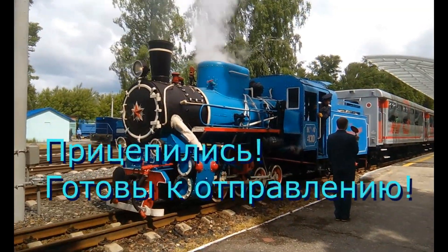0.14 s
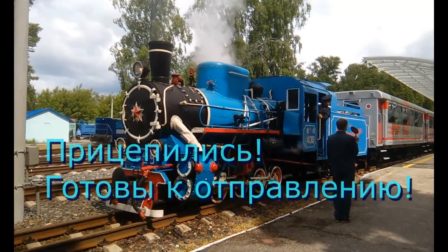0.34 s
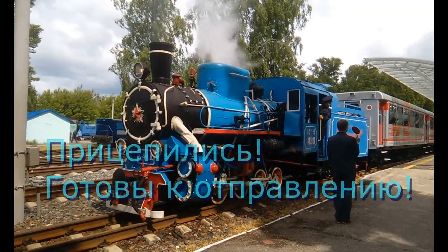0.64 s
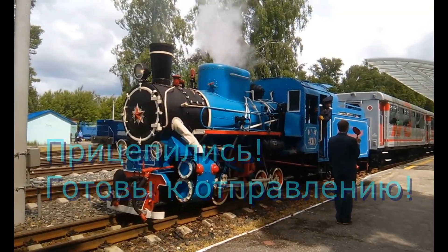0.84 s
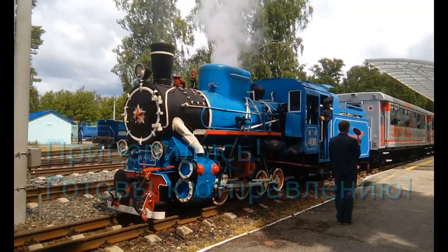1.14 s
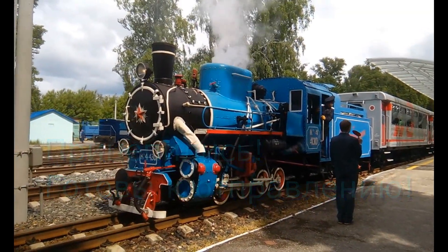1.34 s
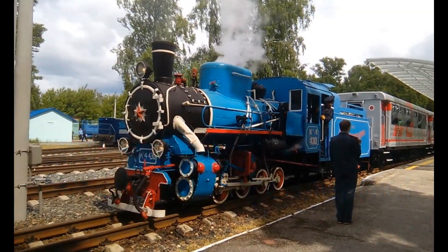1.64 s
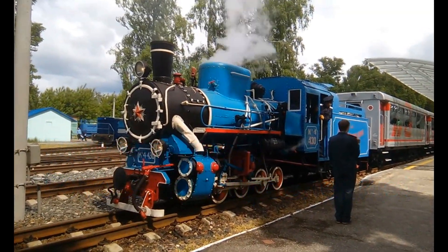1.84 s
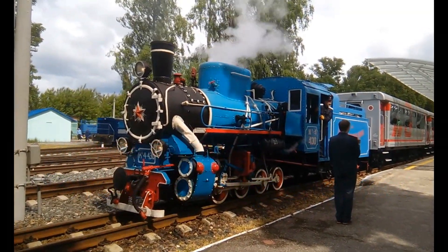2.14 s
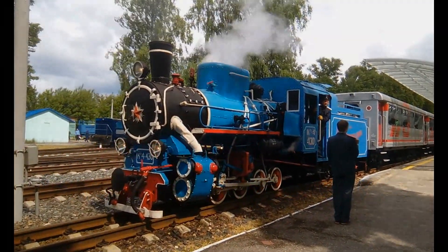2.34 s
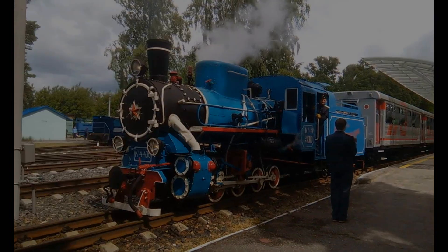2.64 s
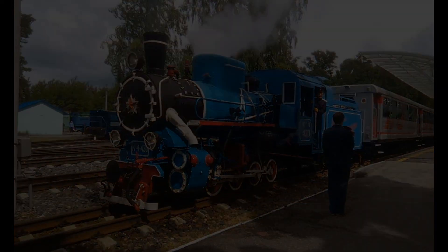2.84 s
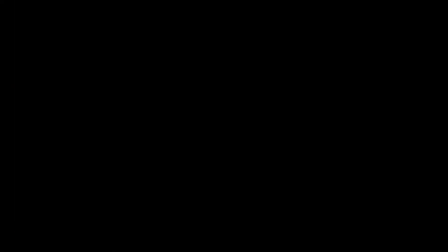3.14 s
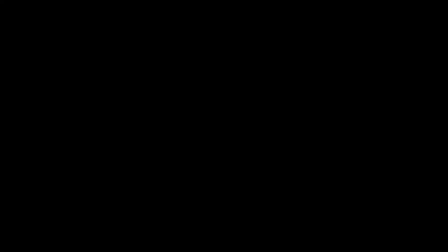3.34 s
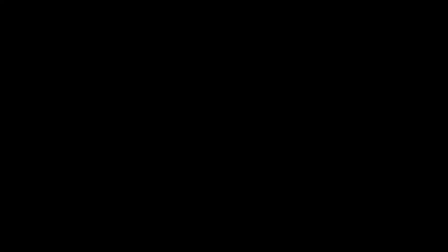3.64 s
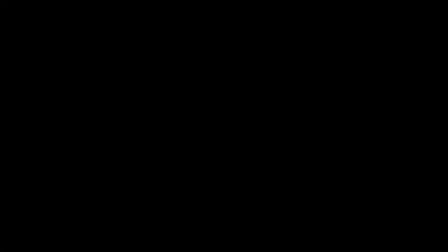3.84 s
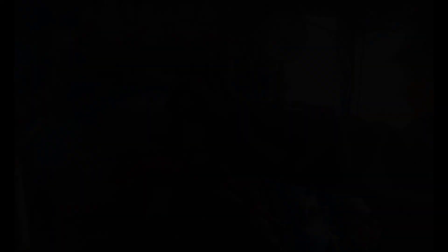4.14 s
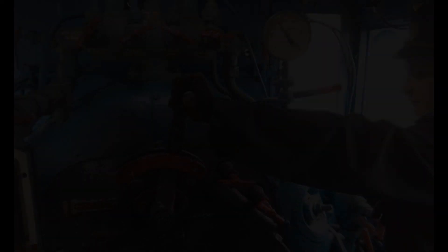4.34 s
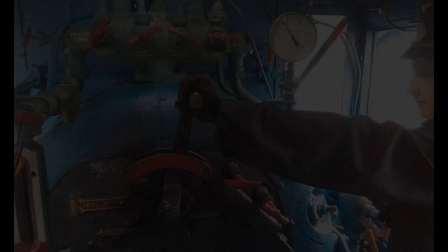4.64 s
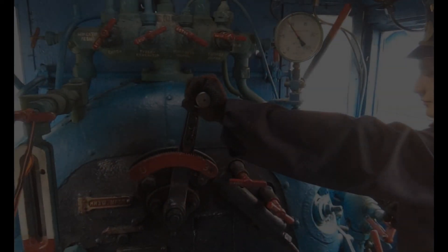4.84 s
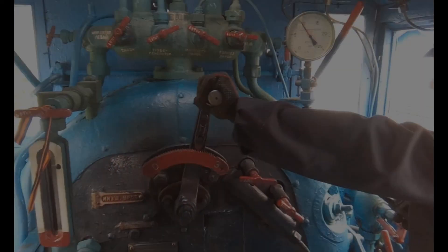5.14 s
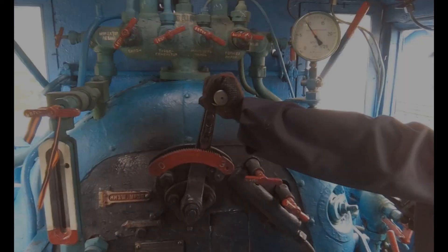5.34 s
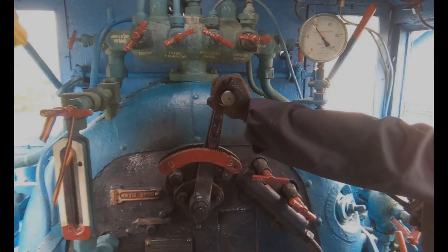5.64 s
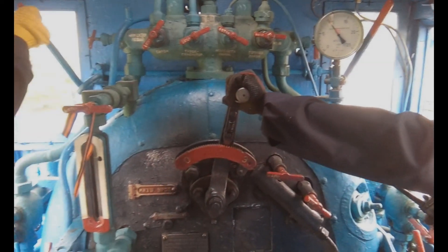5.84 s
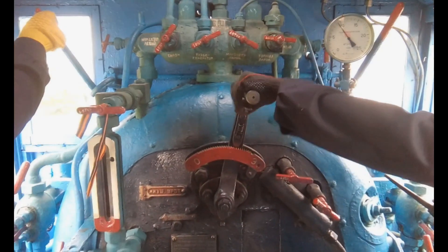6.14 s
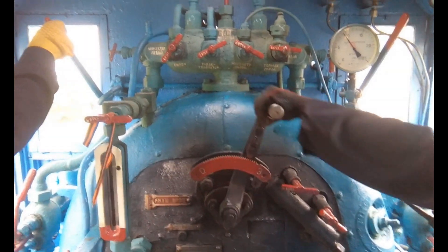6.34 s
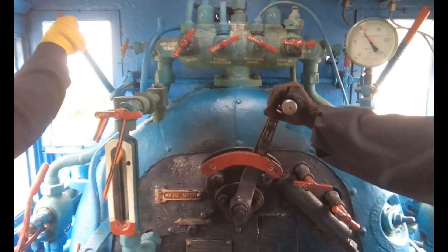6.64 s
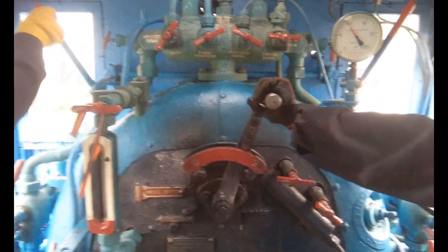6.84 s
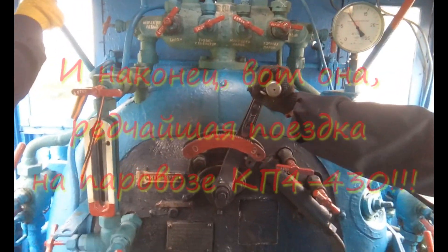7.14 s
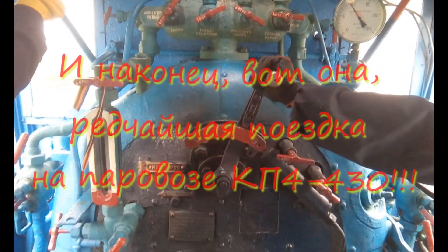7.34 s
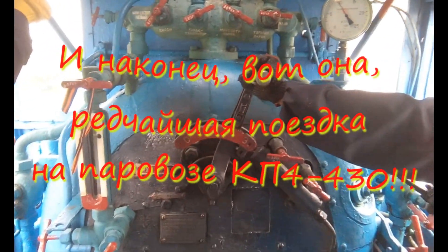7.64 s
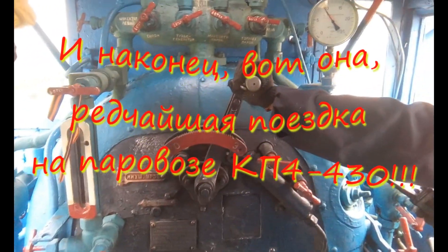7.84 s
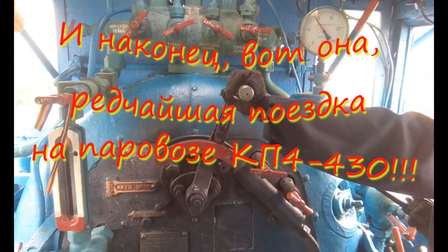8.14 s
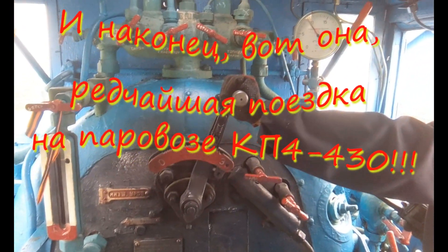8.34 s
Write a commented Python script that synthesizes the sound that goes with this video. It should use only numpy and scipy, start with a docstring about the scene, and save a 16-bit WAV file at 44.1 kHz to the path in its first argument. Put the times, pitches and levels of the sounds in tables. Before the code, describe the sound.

Safety-valve hiss fades gently, a silent gap follows, then low firebox roar swells into a harsh, wavering two-toned locomotive whistle held to the end.

```python
"""Steam locomotive, platform and cab

On the platform a safety valve hisses (shaped noise, nozzle resonances) over chimney draught, wind and
a humming generator (shaft-order sines). After a silent cut the cab fades in: firebox noise, ringing
flues, the generator, then a two-bell whistle, pulled and held: shaken tones, turbulent modes, steam.
Puffs, knocks and thumps (short swells of low noise) fall in both places. Mono, copied to both channels."""
import sys
import numpy as np
from scipy import signal
from scipy.fft import rfft, irfft, next_fast_len
from scipy.io import wavfile
from scipy.ndimage import uniform_filter1d, map_coordinates

SR = 44100
rng = np.random.default_rng(int(sys.argv[2]) if len(sys.argv) > 2 else 0)


def generate_wav(signal):
    """Clip the signal to [-1, 1] and save it as 16-bit WAV at the path in sys.argv[1]."""
    frames = np.transpose(np.atleast_2d(signal))
    scaled = np.clip(frames, -1, 1) * 32767
    pcm = np.round(scaled).astype(np.int16)
    wavfile.write(sys.argv[1], SR, pcm)


N = 375291

# Spectra are relative; noise is normalised before its level is set.
# whistle bell pitch: settled/Hz, slur share, slur/s, flat share, climb/s, cold share, warming/s
LONG_PITCH = (929, -.05, .035, .082, .25, .012, .8)
SHORT_PITCH = (1177, .045, .012, .074, .125, .012, .6)
# bell tones before shake and falter: t/s, level/dB
LONG_TONE = [(4.75, -43), (4.79, -24), (5.02, -17), (5.71, -12), (5.73, -9), (5.96, -12), (5.98, -20.5),
             (6.2, -19), (6.36, -24), (6.41, -12.5), (6.46, -22), (6.62, -12), (6.86, -21), (6.91, -14),
             (6.97, -23.5), (7.01, -15), (7.06, -33), (7.13, -13), (7.18, -28), (7.25, -13), (7.38, -21.5),
             (7.5, -12), (7.63, -12), (7.68, -29), (7.72, -12.5), (7.96, -12), (8.0, -18), (8.06, -10),
             (8.12, -17.5), (8.21, -11), (8.24, -21), (8.32, -14), (8.41, -25), (8.51, -19.5)]
SHORT_TONE = [(4.74, -23.5), (4.79, -13.5), (5.51, -13), (5.55, -7), (5.6, -21), (5.64, -7), (5.75, -17.5),
              (5.81, -6), (5.91, -14.5), (5.93, -24), (5.97, -6), (6.07, -9.5), (6.11, -15.5), (6.2, -6.5),
              (6.27, -17), (6.37, -4.5), (6.41, -27), (6.45, -8.5), (6.57, -6), (6.62, -17.5), (6.82, -6),
              (6.86, -25.5), (6.93, -10), (6.97, -27), (7.0, -18), (7.11, -7), (7.35, -15), (7.37, -7.5),
              (7.62, -16), (7.67, -8), (7.74, -30), (7.83, -6.5), (7.93, -22), (7.98, -9.5), (8.01, -15.5),
              (8.51, -7)]
# turbulent bell modes, relative to blowing strength: multiple of pitch, width/Hz, level/dB
LONG_MODES = [(.81, 48, -32.5), (.95, 39, -16.5), (1, 60, -10.5), (1.699, 40, -28), (2.99, 38, -20.5),
              (3.99, 25, -18.5), (4.19, 50.1, -20.5), (5.42, 46, -23), (5.7, 70, -15.5)]
SHORT_MODES = [(.955, 49.6, -10.5), (1.01, 79.6, -8), (1.8, 30, -30), (2.83, 90, -18), (3.98, 91, -19),
               (4.921, 170, -17), (5.6, 216, -28.5)]
# short bell's octave, flaring as it starts: t/s, level/dB
SQUEAK = [(4.737, -32), (4.745, -31), (4.761, -18.5), (4.79, -34), (4.806, -25), (4.825, -62)]
# overtones: t/s, long bell's octave/dB, short bell's octave/dB, short bell's twelfth/dB
OVERTONES = [(4.85, -43.5, -40, -42), (5.19, -29.5, -32, -29), (5.92, -33.5, -32.5, -21),
             (6.15, -33, -25.5, -21.5), (6.44, -31.5, -33, -21), (6.49, -42, -39, -26),
             (6.88, -30, -43, -31), (6.93, -40, -45, -13), (6.97, -23, -31, -23.5), (7.09, -40, -41, -26),
             (7.76, -32.5, -37, -22), (7.89, -35, -46, -32), (8.09, -26, -25, -23.5),
             (8.23, -30.5, -38, -17), (8.26, -28.5, -49, -31), (8.51, -32.5, -34, -24)]
# whistle jet before surge and wobble: t/s, steam level/dB, rumble level/dB
JET = [(4.75, -29, -48), (4.89, -21.5, -48.5), (5.24, -17, -50), (5.56, -16.5, -41), (5.59, -14.5, -47),
       (5.86, -19.5, -45.5), (5.95, -16.5, -49), (5.97, -21, -41), (6.36, -17.5, -42), (6.44, -17, -41),
       (6.59, -20, -41.5), (6.9, -18, -40.5), (6.98, -16.5, -39), (7.14, -21.5, -44), (7.28, -19, -50),
       (7.39, -19, -41), (7.67, -18.5, -42.5), (7.79, -17.5, -37), (7.86, -22.5, -39), (7.9, -19, -36),
       (8.15, -19, -45), (8.24, -17, -47), (8.3, -22, -46), (8.51, -22, -48)]
# whistle steam, sizzle and rumble spectra: f/Hz, level/dB per Hz
STEAM_SPECTRUM = [(320, -57), (550, -35), (760, -16.5), (1030, -16), (1300, -17.5), (1500, -18.5),
                  (2250, -20), (2970, -18), (3440, -15), (4280, -19), (5200, -16), (6500, -15.5),
                  (8000, -30.5), (10000, -34), (14000, -57)]
SIZZLE_SPECTRUM = [(4410, -19.5), (7500, -5), (8280, -11), (12800, -17.5), (15300, -23.5)]
RUMBLE_SPECTRUM = [(12, -51), (20, -28), (70, -18), (102, -20), (135, -9.5), (305, -5), (420, -1.5),
                   (522, -3.5), (650, -8), (840, -13), (1430, -120)]
# safety valve: t/s, hiss level/dB, nozzle's shrill ring level/dB
VALVE_LEVELS = [(0.0, -35, -29.5), (0.15, -33.5, -34), (0.29, -38.5, -40), (0.32, -37, -35),
                (0.37, -39, -46), (0.64, -41, -45.5), (0.78, -41, -41), (0.93, -43, -45),
                (1.32, -37.5, -34.5), (1.44, -40, -42.5), (1.49, -39, -35), (1.62, -41, -43),
                (2.26, -42.5, -48), (2.59, -43.5, -39.5), (2.63, -43.5, -49), (2.89, -45, -44),
                (2.92, -43.5, -42.5), (3.24, -46, -46)]
# valve hiss and its fine fizz, spectra: f/Hz, level/dB per Hz
VALVE_SPECTRUM = [(1290, -27), (2200, -9.5), (2610, -16.5), (2900, -8.5), (3740, -5), (4560, -11),
                  (5080, 1.5), (6440, -16), (6970, -11.5), (8500, -30), (11000, -50), (18700, -120)]
FIZZ_SPECTRUM = [(4710, -24), (8000, 1.5), (8470, -7), (9040, -0.5), (9420, -5), (10200, -1.5),
                 (10800, -4.5), (11900, -11.5), (14100, -10.5), (15300, -18)]
# nozzle resonances, then its shrill ones, relative: f/Hz, width/Hz, level/dB
NOZZLE_RINGS = [(2980, 160, -18), (3730, 660, -7.5), (5200, 220, -6.5), (5730, 330, 0), (7300, 320, -7)]
SHRILL_RINGS = [(6320, 130, -3), (6630, 160, -4)]
# chimney draught spectrum: f/Hz, level/dB per Hz
DRAUGHT_SPECTRUM = [(150, -38), (250, -2.5), (279, -16), (306, -12), (386, -19), (414, -9), (445, -28),
                    (673, -12), (841, -7.5), (1020, -15), (1140, -11), (1440, -4.5), (1950, -4),
                    (2610, -25), (2800, -16), (3640, -46), (6160, -120)]
# chimney resonances, relative to the draught: f/Hz, width/Hz, level/dB
CHIMNEY_RINGS = [(745, 15, -17.5), (862, 60, -5), (1416, 16, -11)]
# firebox roar spectrum: f/Hz, level/dB per Hz
FIREBOX_SPECTRUM = [(12, -45), (20, -15), (74, -15), (180, -13), (425, -6.5), (531, -13), (721, -1),
                    (979, -17), (1490, -7.5), (2070, -19.5), (4150, -22.5), (5800, -19), (7650, -23),
                    (8320, -33), (15300, -53)]
# flues and leaking fittings, before the cab gain: f/Hz, width/Hz, level/dB
FLUE_RINGS = [(731, 10, -50), (817, 41, -60), (1470, 21, -56), (5270, 60, -73), (5706, 60, -67),
              (6440, 51, -75), (7483, 50, -66), (7698, 50, -74)]
# generator shaft orders, before the order gain: multiple of shaft rate, peak level/dB
FAR_ORDERS = [(1, -79), (2, -63.5), (3, -61), (4, -59.5), (6, -67.5), (11, -78), (12, -54), (17, -62.5)]
NEAR_ORDERS = [(1, -55), (2, -62.5), (4, -59), (6, -56.5)]
# puffs, knocks and thumps: t/s, thud level/dB, boom level/dB, half length to 1/e /s
THUMPS = [(0.296, -58, -47, .04), (0.731, -38, -45, 0.01), (0.743, -48, -46, 0.091),
          (1.07, -66, -51, 0.033), (1.345, -68, -55, 0.054), (1.92, -68, -51, 0.046),
          (2.312, -52, -43, 0.019), (2.88, -72, -51.5, 0.098), (4.728, -45, -43, 0.032),
          (6.416, -29.5, -47, 0.049), (8.492, -56, -62, 0.02)]
# thud, boom and steady wind, spectra: f/Hz, level/dB per Hz
THUD_SPECTRUM = [(100, -30), (190, -5.5), (250, 6.5), (500, -1), (800, -16), (2000, -74)]
BOOM_SPECTRUM = [(15, -30), (40, -12), (80, -6), (160, -2.5), (260, -12), (500, -35)]
WIND_SPECTRUM = [(20, -23), (45, -15), (80, 1.5), (250, -5), (330, -13), (700, -1.5), (1500, -63)]

LEVER_S = 4.734  # whistle valve opens
SEEP_S, SEEP_DB = 4.685, -47  # steam seeps out as the lever starts to move
SIZZLE_DB, SIZZLE_FOLLOWS = -32.5, 0.85  # swings less than the steam
WET_DB, DRY_S, DRYING_S = 5, 5.65, 0.23  # extra sizzle until condensed water is blown out
MUFFLED_DB = 2  # wet steam weakens upper modes
FIZZ_DB, FIZZ_FOLLOWS = -53, .55  # swings less than the valve
DRAUGHT_DB, WIND_DB = -46.5, -58.5
FIREBOX_DB, CAB_GAIN_DB, CAB_GROWS_DB_PER_S = -45.5, -2.4, 1.5  # firebox level precedes the cab gain
ORDER_GAIN_DB = 2
CUT_S, CUT_FALL_S, CUT_DB = 3.2515, .009, -60
FADE_IN_S, FADE_LENGTH_S, FADE_POWER = 4.065, .55, 1.04
LIMIT_DB, LIMIT_S = -6.5, 0.013  # limiter's rms ceiling, averaging time
TOP_HZ = 15420


def amp(db):
    """Decibels to gain."""
    return 10 ** (np.asarray(db) / 20)


def unit(x):
    """Scale to rms 1."""
    return x / np.sqrt(np.mean(np.abs(x) ** 2) + 1e-20)


def curves(rows):
    """Interpolate each column after the time to one value per sample."""
    s, *cols = np.transpose(rows)
    return [np.interp(np.arange(N) / SR, s, c) for c in cols]


def begun(s, rise_s):
    """0 before time s, then a linear ramp to 1."""
    return np.clip((np.arange(N) / SR - s) / rise_s, 0, 1)


def wobble(rate_hz):
    """Smooth random curve, rate_hz knots a second."""
    knots = rng.standard_normal(int(N * rate_hz / SR) + 4)
    coarse = np.arange(0, N + 32, 32)
    return np.interp(np.arange(N), coarse, map_coordinates(knots, [coarse * rate_hz / SR]))


def filtered(x, response):
    """Apply a gain that is a function of frequency."""
    m = next_fast_len(N + 8192)
    return irfft(rfft(x, m) * response(np.fft.rfftfreq(m, 1 / SR)), m)[..., :N]


def rush(spectrum, patchy_db):
    """Coloured noise, rms 1; nearby walls leave narrow, slowly shifting streaks of gain."""
    z = signal.stft(rng.standard_normal(N), nperseg=512)[2]
    field = uniform_filter1d(rng.standard_normal(z.shape), size=2, axis=0)
    field = uniform_filter1d(field, size=50, axis=1)
    noise = signal.istft(z * amp(patchy_db * unit(field)), nperseg=512)[1][:N]
    f, db = np.transpose(spectrum)
    return unit(filtered(noise, lambda hz: amp(np.interp(np.log(hz + 1), np.log(f + 1), db))))


def ringing(modes):
    """Steady turbulence in fixed resonances, each close to its rms level."""
    def peaks(hz):
        return sum(amp(db) / np.sqrt(width) / (1 + (2 * (hz - mid) / width) ** 2) ** 0.84
                   for mid, width, db in modes)
    return filtered(rng.standard_normal(N), peaks) * np.sqrt(SR / 2)


def breathy(turns, width_hz, flicker_db):
    """Turbulence in one resonance that follows the phase in turns; rms 1."""
    m = next_fast_len(N)
    hz = np.fft.rfftfreq(m, 1 / SR)
    bands = np.exp(2j * np.pi * rng.random((2, len(hz)))) / (1 + (2 * hz / width_hz) ** 2)
    slow = irfft(bands, m)[:, :N]
    carried = slow[0] * np.cos(2 * np.pi * turns) + slow[1] * np.sin(2 * np.pi * turns)
    return unit(amp(flicker_db * wobble(4)) * carried)


def bell_pitch(pitch):
    """Pitch slurs as the bell speaks, climbs from flat with pressure, creeps up as the bell warms; Hz."""
    settled_hz, slur, slur_s, flat, climb_s, cold, warming_s = pitch
    since = np.clip(np.arange(N) / SR - LEVER_S, 0, None)
    slurred = slur * np.exp(-since / slur_s)
    flattened = flat * np.exp(-(since / climb_s) ** 2)
    chilled = cold * np.exp(-since / warming_s)
    return settled_hz * (1 - slurred - flattened - chilled)


def bell(pitch, rows, modes, drift, shake_db, falter_db, rough):
    """Jet-shaken tone plus modal turbulence at the mean blowing strength; also returns phase in turns."""
    start_s = rows[0][0]
    db = curves(rows)[0]
    # condensed water roughens the start
    wet = 1 + rough * begun(start_s, .1) * (1 - begun(start_s + .1, .4))
    turns = np.cumsum(bell_pitch(pitch) * (1 + drift * wet * wobble(40))) / SR
    falters = falter_db * wet ** .5 * np.clip(wobble(18) - .55, 0, None)  # brief sinkings
    tone = np.sqrt(2) * amp(db + shake_db * wobble(45) - falters) * np.sin(2 * np.pi * turns)
    blowing = uniform_filter1d(amp(db), size=SR // 4)
    muffled = MUFFLED_DB * (1 - begun(DRY_S, DRYING_S))
    breath = 0
    for k, width_hz, level_db in modes:
        build_up = begun(start_s, 6 / width_hz)  # narrower modes build up slower
        gain = amp(level_db - muffled * (k > 2.9)) * build_up
        breath = breath + gain * breathy(k * turns, width_hz, flicker_db=3.0)
    return (tone + blowing * breath) * begun(start_s, 0.0037), turns


def overtones(low_turns, high_turns):
    """Octaves and twelfth as narrow turbulence on the bells' phases, plus the starting squeak."""
    squeak = np.sqrt(2) * amp(curves(SQUEAK)[0]) * np.sin(2 * np.pi * 2 * high_turns)
    squeak = squeak * begun(SQUEAK[0][0], 0.0036)
    low_db, high_db, twelfth_db = curves(OVERTONES)
    octaves = amp(low_db) * breathy(2 * low_turns, 26, flicker_db=1.4)
    octaves = octaves + amp(high_db) * breathy(2 * high_turns, 38, flicker_db=-0.5)
    octaves = octaves * begun(OVERTONES[0][0], 0.16)
    twelfth = amp(twelfth_db) * breathy(2.955 * high_turns, 95, flicker_db=1.2)
    return squeak + octaves + twelfth * begun(LEVER_S, 0.044)


def steam_jet():
    """Escaping steam: broadband roar, sizzle and rumble; the seep precedes the valve opening."""
    steam_db, rumble_db = curves(JET)
    surge = wobble(24) + .4 * wobble(9)  # wet steam surges through the gap
    opened = begun(LEVER_S, 0.0033)
    seep = amp(SEEP_DB) * begun(SEEP_S, 0.016)
    steam = (amp(steam_db + 1.01 * surge) * opened + seep) * rush(STEAM_SPECTRUM, patchy_db=2.5)
    swing_db = SIZZLE_FOLLOWS * (steam_db - np.median(steam_db[-SR:]))
    wet_db = WET_DB * (1 - begun(DRY_S, DRYING_S))
    sizzle = amp(SIZZLE_DB + swing_db + wet_db + 0.69 * surge) * rush(SIZZLE_SPECTRUM, patchy_db=3.5)
    rumble = amp(rumble_db + 2.0 * wobble(16)) * rush(RUMBLE_SPECTRUM, patchy_db=2.0)
    return steam + (sizzle + rumble) * opened


def whistle():
    """Two bells a third apart, wandering overtones and the steam jet that blows them."""
    low, low_turns = bell(LONG_PITCH, LONG_TONE, LONG_MODES,
                          drift=0.00296, shake_db=1.0, falter_db=7.5, rough=3.12)
    high, high_turns = bell(SHORT_PITCH, SHORT_TONE, SHORT_MODES,
                            drift=.005, shake_db=1.4, falter_db=3, rough=1.227)
    return low + high + overtones(low_turns, high_turns) + steam_jet()


def safety_valve():
    """Steam hiss through a resonant nozzle, with a shrill ring and a fine fizz."""
    valve_db, shrill_db = curves(VALVE_LEVELS)
    hiss = rush(VALVE_SPECTRUM, patchy_db=3.0) + amp(2.5) * unit(ringing(NOZZLE_RINGS))
    valve = amp(valve_db) * unit(hiss)
    shrill = amp(shrill_db + 1.4 * wobble(15)) * unit(ringing(SHRILL_RINGS))
    swing_db = FIZZ_FOLLOWS * (valve_db - np.median(valve_db))
    fizz = amp(FIZZ_DB + swing_db + .6 * wobble(6.6)) * rush(FIZZ_SPECTRUM, patchy_db=1.0)
    return valve + shrill + fizz


def chimney_draught():
    """Draught noise with chimney resonances, slightly unsteady."""
    air = rush(DRAUGHT_SPECTRUM, patchy_db=1.5) + ringing(CHIMNEY_RINGS)
    return amp(DRAUGHT_DB + 0.84 * wobble(7.47)) * air


def generator(shaft_hz, orders, drift, waver_db):
    """Shaft orders of a small turbine, unsteady in speed and level."""
    turns = np.cumsum(shaft_hz * (1 + drift * wobble(8.2))) / SR
    hum = 0
    for k, db in orders:
        gain = amp(db + ORDER_GAIN_DB + waver_db * wobble(8.3))
        hum = hum + gain * np.sin(2 * np.pi * (k * turns + rng.random()))
    return hum


def wind():
    """Light, steady wind: low noise with a small level wobble."""
    return amp(WIND_DB + 1.1 * wobble(7)) * rush(WIND_SPECTRUM, patchy_db=-2.0)


def platform():
    """Valve, draught, wind and far generator, falling to silence at the cut."""
    hum = generator(69.4, FAR_ORDERS, drift=0.00316, waver_db=0.5)
    outside = safety_valve() + chimney_draught() + wind() + hum
    return outside * (amp(CUT_DB * begun(CUT_S, CUT_FALL_S)) - amp(CUT_DB))


def cab():
    """Firebox roar, singing flues and near generator; fades in, then grows steadily."""
    firebox = amp(FIREBOX_DB) * rush(FIREBOX_SPECTRUM, patchy_db=5.5)
    hum = generator(70.6, NEAR_ORDERS, drift=0.0011, waver_db=3.1)
    inside = firebox + ringing(FLUE_RINGS) + hum
    fade = begun(FADE_IN_S, FADE_LENGTH_S) ** FADE_POWER
    since = np.clip(np.arange(N) / SR - FADE_IN_S - FADE_LENGTH_S, 0, None)
    return inside * fade * amp(CAB_GROWS_DB_PER_S * since + CAB_GAIN_DB)


def puffs_and_thumps():
    """Short puffs and thumps: a thud and a deeper boom under Gaussian swells."""
    t = np.arange(N) / SR
    thud, boom = np.zeros((2, N))
    for s, thud_db, boom_db, half_s in THUMPS:
        swell = np.exp(-((t - s) / half_s) ** 2)
        thud = thud + amp(thud_db) * swell
        boom = boom + amp(boom_db) * swell
    return thud * rush(THUD_SPECTRUM, patchy_db=0) + boom * rush(BOOM_SPECTRUM, patchy_db=0)


def scene():
    """Both places, identical on either channel."""
    return np.tile(whistle() + platform() + cab() + puffs_and_thumps(), (2, 1))


def record(dry):
    """Limiter on loud swells, soft clipping towards full scale, steep low-pass at TOP_HZ."""
    span = round(LIMIT_S * SR)
    level = np.sqrt(np.abs(uniform_filter1d(dry ** 2, size=span)))
    gain = (1 + (level / amp(LIMIT_DB)) ** 6) ** (-1 / 6)
    held = dry * uniform_filter1d(gain, size=span)
    soft = held / (1 + np.abs(held) ** 8) ** (1 / 8)
    return filtered(soft, lambda hz: 1 / (1 + (hz / TOP_HZ) ** 600))


dry = scene()
out = record(dry)
generate_wav(out)
```